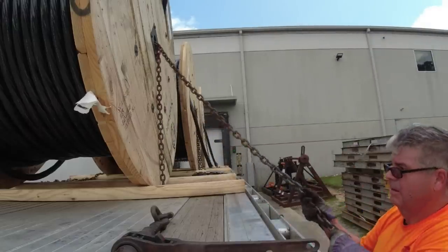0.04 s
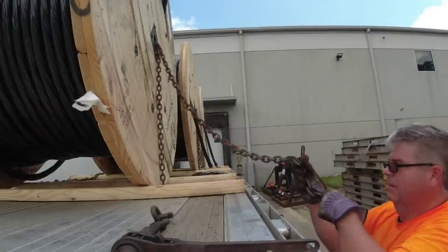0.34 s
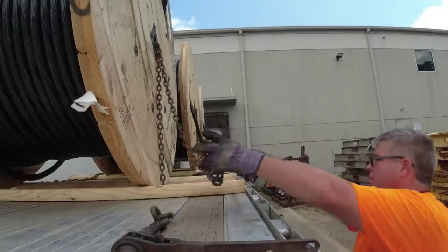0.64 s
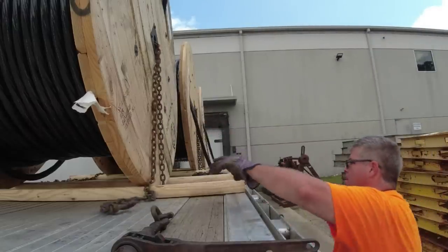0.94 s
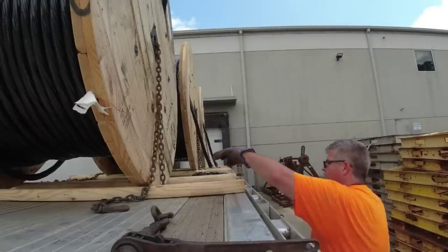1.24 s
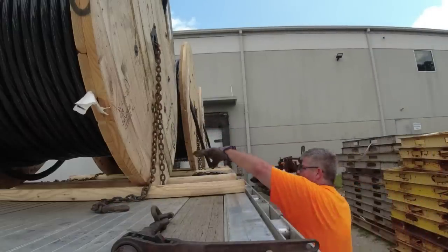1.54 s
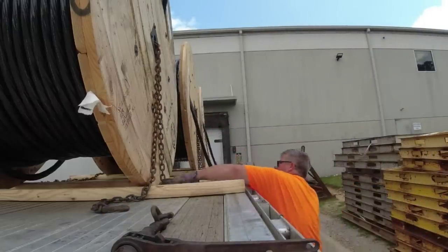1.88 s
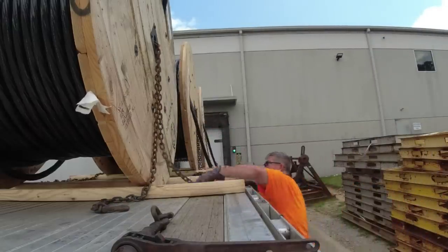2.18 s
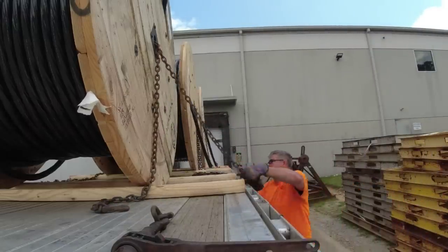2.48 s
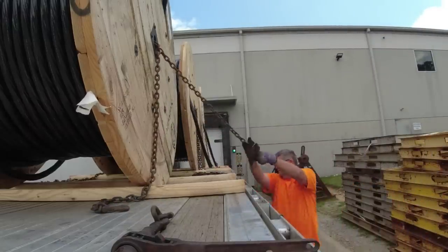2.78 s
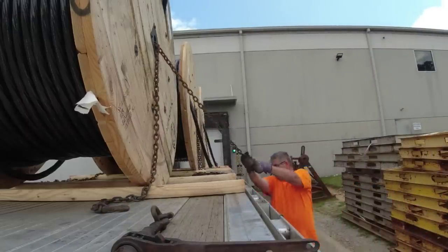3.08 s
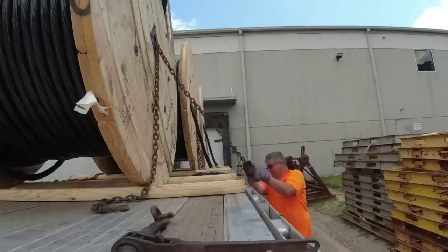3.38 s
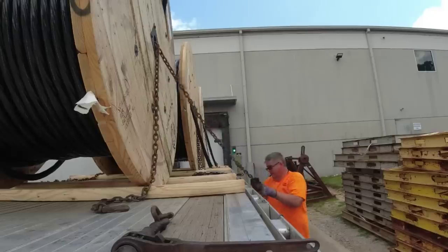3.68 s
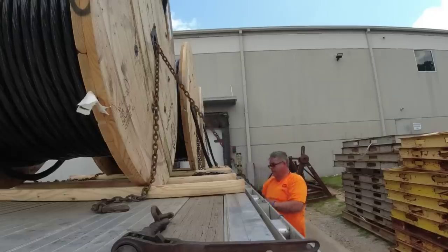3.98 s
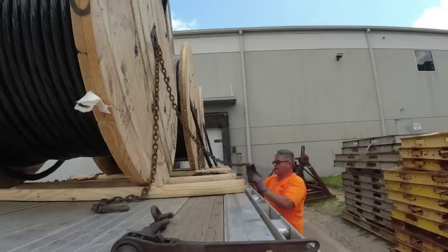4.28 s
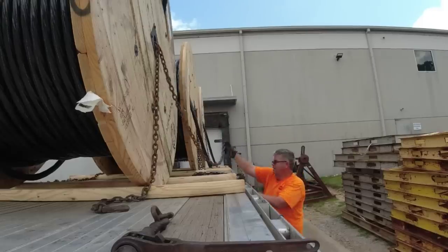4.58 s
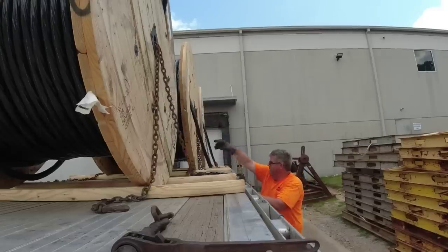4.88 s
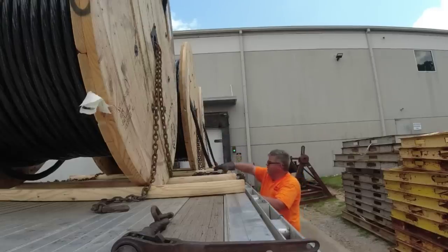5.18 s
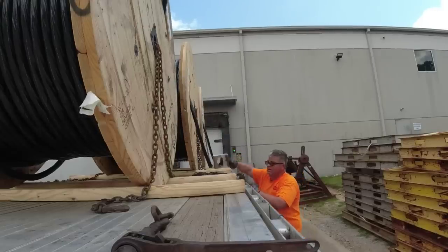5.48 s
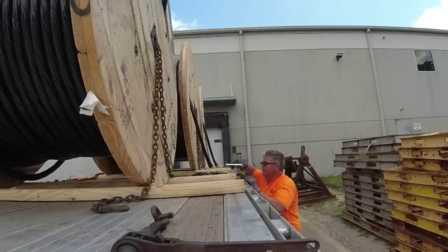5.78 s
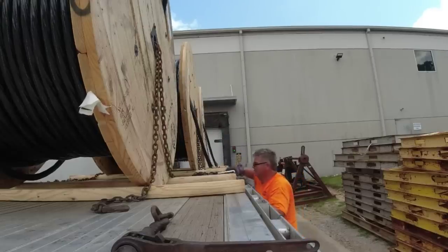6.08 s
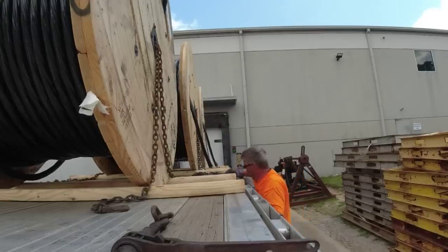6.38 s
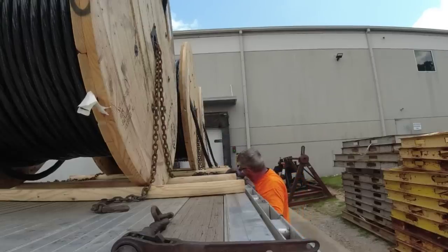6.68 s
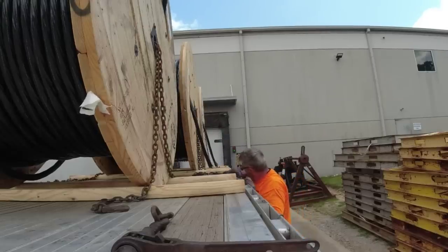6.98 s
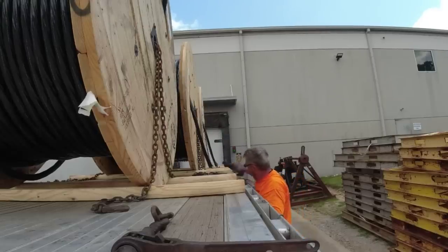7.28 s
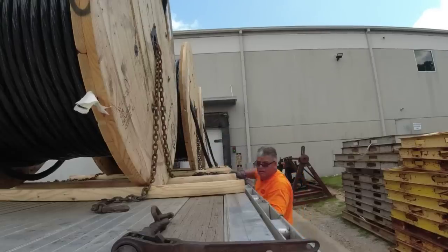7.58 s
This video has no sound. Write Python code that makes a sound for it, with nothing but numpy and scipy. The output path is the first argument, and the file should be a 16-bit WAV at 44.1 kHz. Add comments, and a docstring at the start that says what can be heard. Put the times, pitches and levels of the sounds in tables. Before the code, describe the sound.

A diesel engine idles with a low, steady hum throughout, over faint distant machinery in an open yard. After a few tiny clinks, a steel chain crashes onto a trailer deck close by at about 0.9 seconds, thumping the boards and jingling, slightly overloading the microphone. A soft clink comes just after 2 seconds. From 3 seconds the chain scrapes over a wooden cable reel, links ticking louder and the wood knocking dully, until it comes free with a clank at about 4.1. A light ping follows at 4.5. At 5 seconds comes a second loud crash, with a sharp ping of the hook and rattling that settles by 5.8. Smaller clanks land around 6.3 and 7.2 seconds. From 7 seconds to the end, the trailer bed gives a deep boom. A warehouse wall adds a faint, dull echo to the impacts.

```python
"""A yard beside a warehouse, the microphone close to a flatbed trailer, a diesel idling nearby.
A steel tie-down chain is tossed onto the deck, hauled over a wooden cable reel and dropped again.
Heaps of links clatter and thump the boards, single links tick and ring, the hook pings, the reel knocks.
The heaviest falls overload the microphone, and near the end the trailer bed booms as it is leant on.
The warehouse wall returns a faint tail; far machinery and air lie underneath."""
import sys
import numpy as np
from scipy import signal
from scipy.fft import rfft, irfft
from scipy.io import wavfile

SR = 44100
rng = np.random.default_rng(int(sys.argv[2]) if len(sys.argv) > 2 else 0)


def write(x):
    x = np.atleast_2d(x).T
    wavfile.write(sys.argv[1], SR, np.round(np.clip(x, -1, 1) * 32767).astype(np.int16))


N = 341334
T = np.arange(N) / SR
HIT = T[:SR // 2]  # time axis of one impact
HOLD_S = 0.0081  # links keep arriving at full strength this long

# Modes of the deck boards and steel frame. Each row: frequency in Hz, relative level in dB, t60 in seconds.
DECK_MODES = [(252, -14.5, 0.051), (378, -4.5, 0.13), (434.4, -4.5, 0.13), (500.6, -2, .18),
              (572.4, -5, .18), (627.5, -5.5, 0.16), (752.2, 0, 0.12), (867, -5, 0.12), (1100, 0.5, 0.12),
              (1348, -10, 0.22), (1535, -8, 0.18), (1623, -9.5, 0.29), (1950, -8.5, 0.24),
              (2230, -1, 0.076), (2471, -5.5, 0.35), (2768, -0.5, 0.19), (3526, -7.5, 0.15),
              (4130, -1, 0.14)]
# The chain sliding over the reel's rim. Each row: time in seconds, level in dB.
DRAG_LEVELS = [(2.981, -62), (3.032, -36.5), (3.156, -32.5), (3.28, -41), (3.36, -27.5), (3.54, -23.5),
               (3.62, -26), (3.83, -28.5), (4.1, -25)]


def amp(db):
    """Decibels to gain."""
    return 10 ** (np.asarray(db) / 20)


def unit(x, size=None):
    """Scale to rms 1, judged over the first `size` samples or over all."""
    return x / np.sqrt(np.mean(x[:size] ** 2) + 1e-18)


def add(track, s, sound):
    """Mix a sound in at s seconds."""
    start = max(int(s * SR), 0)
    track[start:start + len(sound)] += sound[:N - start]


def fade(t, t60):
    """Exponential decay, 60 dB down after t60 seconds."""
    return np.exp(-np.log(1000) * t / np.maximum(t60, 1e-3))


def band(x, lo_hz, hi_hz, order=3):
    """Causal band-pass."""
    sos = signal.butter(order, [lo_hz, min(hi_hz, SR / 2 - 1)], "band", fs=SR, output="sos")
    return signal.sosfilt(sos, x)


def colour(x, points, size=2048):
    """Causal filter through (Hz, dB) points, by way of the cepstrum."""
    hz, db = np.transpose(points)
    bin_hz = np.arange(size // 2 + 1) * SR / size
    gain = amp(np.interp(np.log(bin_hz + 1), np.log(hz), db))
    cepstrum = irfft(np.log(gain))
    cepstrum[1:size // 2] *= 2  # fold to minimum phase
    cepstrum[size // 2 + 1:] = 0
    return signal.fftconvolve(x, irfft(np.exp(rfft(cepstrum))))[:len(x)]


def walk(rate):
    """Slow random wander with a spread near 1, turning `rate` times a second."""
    return np.interp(T * rate, np.arange(512), rng.standard_normal(512))


def ring(hz, gain, t60):
    """Struck modes: a sum of decaying sines."""
    t = HIT.astype(np.float32)
    turn = np.float32(2 * np.pi * hz)
    loss = np.float32(np.log(1000) / np.maximum(t60, 1e-3))
    modes = np.sin(np.outer(turn, t)) * np.exp(-np.outer(loss, t))
    return (np.float32(gain) @ modes).astype(float)


def contacts(n, rate, spread_db):
    """Random clicks of uneven strength, about `rate` a second."""
    clicks = (rng.random(n) < rate / SR) * rng.choice([-1, 1], n)
    return clicks * amp(spread_db * np.clip(rng.standard_normal(n), -2, 2))


def pour(t, settle_s, rest_s=.34):
    """Strength of the contacts: steady while links arrive, then dying as the heap settles and rests."""
    settling = np.maximum(t - HOLD_S, 0) / max(settle_s, .004)
    return (t >= 0) * np.exp(-settling - (t / rest_s) ** 4)


def crunch(hits, t60):
    """Every contact sets off its own short, pitchless crack."""
    power = signal.fftconvolve(hits ** 2, unit(fade(HIT, t60)) ** 2)[:len(hits)]
    return np.sqrt(np.abs(power)) * rng.standard_normal(len(hits))


def diesel(cycle_hz=14.9, waver_db=0.84, smear=0.037, rumble_db=-45):
    """A diesel idles nearby: steady exhaust lines, each wavering a little, over a soft rumble."""
    # The exhaust note at the microphone. Each row: time in seconds, level in dB.
    idle_levels = [(0, -31.5), (2.802, -33.5), (3.7, -31), (7.699, -30.5)]
    # Exhaust lines; six cylinders stress every third.
    # Each row: multiple of the cycle rate, relative level in dB.
    orders = [(3, 0.5), (4, -3), (5, -11.5), (6, -5.5), (7, -7), (8, -6), (9, 0), (11, -4), (12, 0.5),
              (13, -24.5), (14, -17), (16, -11.5), (17, -16.5), (19, -23), (20, -17), (22, -20),
              (23, -18.5), (28, -18.5)]
    lines = 0
    for order, line_db in orders:
        # the silencer delays higher lines more, which smears the firings into a smooth drone
        cycles = cycle_hz * T - smear * order
        lines += amp(line_db + waver_db * walk(4.8)) * np.sin(2 * np.pi * order * cycles)
    rumble_colour = [(15, -5.5), (35, 4.5), (130, -12.5), (300, -7.5),
                     (450, -14.5), (900, -35), (3000, -75.5)]
    rumble = colour(rng.standard_normal(N), rumble_colour)
    s, db = np.transpose(idle_levels)
    return unit(lines) * amp(np.interp(T, s, db)) + amp(rumble_db) * unit(rumble)


def yard(level_db=-44.5):
    """Far machinery and air, smooth and steady."""
    # Spectrum of the open yard. Each row: frequency in Hz, relative level in dB.
    yard_colour = [(150, -8), (300, 1.5), (400, -6), (600, -7.5), (930, -11), (2100, -18.5), (3500, -27),
                   (5500, -33.5), (8000, -47), (15000, -75)]
    return unit(colour(rng.standard_normal(N), yard_colour)) * amp(level_db)


def tick(snap_t60=0.007, rustle_t60=0.3, rustle_db=-22, ring_t60=0.059, ring_db=-4, count=12):
    """A hard snap, a damped ring of the taut link and a short rustle of its neighbours."""
    # Tone of a snapping link. Each row: frequency in Hz, relative gain in dB.
    tick_colour = [(200, 5), (1300, 12.5), (2500, -3), (4800, 5), (6000, -1), (7200, -8), (11000, -15.5),
                   (15500, -30)]
    envelope = fade(HIT, snap_t60) + amp(rustle_db) * fade(HIT, rustle_t60)
    snap = rng.standard_normal(len(HIT)) * envelope
    chink = ring(rng.uniform(2500, 6500, count), rng.standard_normal(count), np.full(count, ring_t60))
    return unit(colour(unit(snap) + amp(ring_db) * unit(chink), tick_colour), size=1323)


def ticks(tick_db=-3, pull_s=3.48, links_per_s=25, train_db=-7.5, jitter=0.29, scatter_db=3):
    """Lone snaps, then from pull_s a loose train of links crossing the rim that grows with the pull."""
    # Single links snapping over an edge. Each row: start in seconds, relative level in dB.
    snaps = [(0.131, -50), (0.15, -47.5), (0.199, -58), (0.23, -56), (3.036, -43), (3.079, -35.5),
             (3.158, -36), (3.336, -33.5), (3.352, -31), (3.458, -30), (3.523, -29), (3.568, -27.5),
             (3.745, -27), (3.777, -28), (4.039, -30), (5.446, -24.5)]
    out = np.zeros(N)
    for s, db in snaps:
        add(out, s, amp(db + tick_db) * tick())
    drag_s, drag_db = np.transpose(DRAG_LEVELS)
    full_db, growth = -24, 2  # around the full pull, ticks change 2 dB for each dB of sliding
    for s in np.arange(pull_s, drag_s[-1], 1 / links_per_s):
        late, strength = rng.standard_normal(2)
        pull_db = full_db + growth * (np.interp(s, drag_s, drag_db) - full_db)
        db = pull_db + train_db + scatter_db * strength
        add(out, s + jitter * late / links_per_s, amp(db + tick_db) * tick())
    return out


def free_links(top_db, shake_s, detune, scatter_db=2, count=5, top_above_hz=13000):
    """A few free links of slightly unlike pitch jostle each other and ring on."""
    # Modes of a free link. Each row: frequency in Hz, relative level in dB, t60 in seconds.
    link_modes = [(3790, -7, 0.24), (4944, -7, .17), (5260, 0.5, 0.27), (6860, -5, .35), (10000, -13, 0.34),
                  (12150, -19, 0.27), (13600, -1, .2), (14300, -2, .2), (14650, -1, .2), (15020, -3.5, .15)]
    hz, db, t60 = np.transpose(link_modes)
    db = db + top_db * (hz > top_above_hz)
    out = 0
    for _ in range(count):
        offset, strength = rng.standard_normal((2, len(hz)))
        tone = ring(hz * (1 + detune * offset), amp(db + scatter_db * strength), t60)
        shake = contacts(len(HIT), rate=610, spread_db=2) * pour(HIT + HOLD_S, shake_s)
        out = out + signal.fftconvolve(shake / np.linalg.norm(shake), tone)
    return out / np.sqrt(count)


def jingles(detune=0.0053, detune_per_s=.12):
    """Loose links ring when nudged or dropped; a longer shake stirs links of more varied size."""
    # Links left free to ring. Each row: start in seconds, level in dB, extra gain of the top
    # partials in dB, shaking time in seconds.
    nudges = [(0.145, -69, 13, 0.079), (0.279, -61, 24, 0.014), (0.665, -69.5, 18, 0.0082),
              (0.755, -39, 3, 0.028), (0.9, -20.5, 9.5, 0.07), (1.115, -23, 0.5, 0.02),
              (2.126, -59, -8, .012), (4.129, -35, -25, .02), (4.781, -52.5, -27.5, 0.0063),
              (4.873, -41, -13, 0.011), (5.0, -27.5, 9, .08), (5.255, -27.5, -3.5, .04),
              (5.44, -40, -2, .02), (5.715, -50, -14.5, .012)]
    out = np.zeros(N)
    for s, db, top_db, shake_s in nudges:
        add(out, s, amp(db) * free_links(top_db, shake_s, detune + detune_per_s * shake_s))
    return out


def clank(settle_s, deck_db=-7, heap_db=-1, heap_t60=0.071, lead_db=9, rise_s=0.0017, count=56):
    """A run of link contacts, then the slack end; each cracks and rings the deck and the heap of links."""
    # Tone of a landing, heard close. Each row: frequency in Hz, gain in dB.
    clank_colour = [(100, -17.5), (250, -2), (500, -6.5), (1000, -2), (1600, 3), (2500, -1.5), (3200, -2),
                    (4500, -0.5), (6000, -11), (7200, -21), (12500, -28.5), (15500, -40)]
    hits = contacts(len(HIT), rate=750, spread_db=5.5)
    hits[0] = amp(lead_db)
    slack_end = amp(-13.5) * pour(HIT - 1.5 * settle_s, 0.88 * settle_s)
    hits *= np.hypot(pour(HIT, settle_s), slack_end)
    hz, db, t60 = np.transpose(DECK_MODES)
    # the chain's own weight shifts the deck modes a little
    loaded_hz = hz * (1 + .015 * rng.standard_normal(len(hz)))
    deck = ring(loaded_hz, amp(db) * rng.choice([-1, 1], len(hz)), t60)
    # links wedged against each other ring at new pitches with every landing; high modes die first
    heap_hz = 700 * 20 ** ((np.arange(count) + rng.random(count)) / count)
    heap_gain = rng.choice([-1, 1], count) * np.sqrt(heap_hz)
    heap = ring(heap_hz, heap_gain, heap_t60 * np.sqrt(3000 / heap_hz))
    rings = signal.fftconvolve(hits, amp(deck_db) * unit(deck) + amp(heap_db) * unit(heap))[:len(HIT)]
    cracks = crunch(hits, t60=.055)
    return colour((rings + cracks) * (1 - np.exp(-HIT / rise_s)), clank_colour)


def clanks(clang_db=-2.5, sizzle_trim_db=-3):
    """Landings on wood thud; landings have a hard edge, and their sizzle depends on whether the reel shadows
    them from the microphone."""
    # Lengths of chain landing. Each row: start in seconds, base level in dB, offsets in dB for thud,
    # edge and sizzle (before its trim), settling time in seconds.
    landings = [(0.275, -37, -3.5, -22, -19, 0.0076), (0.356, -40, -8, -12.5, -25, 0.019),
                (0.859, -8.5, -8, -18.5, -23.5, 0.038), (0.879, -2, -10.5, -1.5, -17, 0.083),
                (0.958, -2.5, -12.5, -6.5, -16.5, 0.049), (1.109, -10.5, -10, -6, -13, 0.036),
                (1.138, -13, -10, -7.5, -24, 0.038), (1.504, -42, -24, -8.5, -45, 0.0096),
                (2.121, -35, 2, -6.5, -10, 0.022), (2.149, -28.5, -2, -24, -38, 0.043),
                (2.204, -35, 2, -4.5, -24, 0.019), (3.18, -47, 11.5, -29, -45, 0.044),
                (3.441, -32.5, 7, -6, -16, .04), (3.549, -27.5, -8, -8, -24, 0.035),
                (3.624, -20, -10, -4.5, -24, 0.044), (3.871, -37, 13.5, -5, -35, 0.022),
                (4.129, -14, -11, -7, -24, 0.053), (4.364, -39.5, -19, -8.5, -27, 0.018),
                (4.549, -23.5, -18, -15, -29.5, 0.039), (4.992, -2, -6, -7, -14.5, 0.058),
                (5.173, -17, -5, -7.5, -11.5, 0.046), (5.235, -4.5, -14.5, -10, -28.5, 0.042),
                (5.336, -20, -10, -5, -16, 0.061), (5.461, -25, -17.5, -4, -13, 0.044),
                (5.53, -33.5, -27, -12, -30, 0.037), (5.698, -33.5, -30, -16, -31, .065),
                (5.891, -50, 7.5, -30, -40, 0.0098), (6.239, -23, -2, -18, -43.5, 0.033),
                (6.279, -25.5, -2, -8, -32, 0.033), (6.356, -16.5, -4, -3, -11.5, 0.035),
                (6.802, -42.5, 2.5, -19, -50, .03), (7.052, -23, -0.5, -11, -34, 0.055),
                (7.166, -16, -4, -9.5, -43, .037), (7.237, -22.5, 3.5, -14, -32, 0.027)]
    out = np.zeros(N)
    for s, db, thud_db, edge_db, sizzle_db, settle_s in landings:
        sound = clank(settle_s)
        bands = [(150, 667, thud_db), (780, 2660, clang_db),
                 (3050, 7300, edge_db), (6760, 17000, sizzle_db + sizzle_trim_db)]
        for lo_hz, hi_hz, band_db in bands:
            part = unit(band(sound, lo_hz, hi_hz, order=4), size=1764)  # level set on the first 40 ms
            add(out, s, amp(db + band_db) * part)
    return out


def slams(thump_t60=0.08, db_per_octave=-14):
    """The chain's weight drives the boards, most strongly near a pitch that depends on where it lands."""
    # The heaviest falls. Each row: start in seconds, level in dB, centre frequency in Hz.
    falls = [(0.859, -0.5, 477), (0.965, -1.5, 760), (1.01, -10, 750), (4.993, -2, 440),
             (6.242, -18.5, 393), (7.168, -20.5, 560)]
    out = np.zeros(N)
    hz, db, _ = np.transpose(DECK_MODES)
    for s, slam_db, centre_hz in falls:
        octaves_off = np.abs(np.log2(hz / centre_hz))
        gain = amp(db + db_per_octave * octaves_off) * rng.choice([-1, 1], len(hz))
        thump = ring(hz, gain, np.full(len(hz), thump_t60))
        add(out, s, amp(slam_db) * unit(thump, size=882))
    return out


def pings_and_knocks(rise_s=0.0014):
    """The hook pings and the boards and reel knock, each strike on a single mode."""
    # Lone notes. Each row: start in seconds, frequency in Hz, level in dB, t60 in seconds.
    strikes = [(0.965, 731.6, -6.5, 0.41), (3.445, 94, -12.5, .28), (3.556, 119, -13.5, .21),
               (3.872, 142, -13.5, 0.085), (4.55, 2060, -29.5, .36), (4.553, 2790, -27.5, 0.35),
               (4.995, 251, -13.5, 0.55), (4.996, 517, -5.5, .17), (5.237, 2392, -3, 0.11),
               (5.511, 5880, -29.5, 0.45), (5.53, 3100, -26.5, .19), (5.53, 1042, -36, 0.88),
               (6.28, 3175, -16, 0.1), (6.361, 192, -14.5, 0.16), (7.169, 552, -15.5, 0.39)]
    out = np.zeros(N)
    attack = 1 - np.exp(-HIT / rise_s)
    for s, hz, db, t60 in strikes:
        add(out, s, amp(db) * np.sin(2 * np.pi * hz * HIT) * fade(HIT, t60) * attack)
    return out


def drag(stop_t60=0.89):
    """Links bump and scrape along the reel's wooden rim until the chain comes free."""
    # Tone of steel sliding on the reel. Each row: frequency in Hz, relative gain in dB.
    drag_colour = [(100, 4), (220, 3), (350, 2.5), (400, -8), (480, 6.5), (600, -9.5), (850, -12),
                   (1220, 3), (1770, -13.5), (2800, -10), (3300, -21), (4500, -19), (5800, -23),
                   (9000, -46), (15000, -51.5)]
    s, db = np.transpose(DRAG_LEVELS)
    scrape = crunch(contacts(N, rate=350, spread_db=3), t60=.03)
    level = amp(np.interp(T, s, db, left=-120)) * fade(np.maximum(T - s[-1], 0), stop_t60)
    return unit(colour(scrape, drag_colour)) * level


def sway(mode_hz=51.5, wander_hz=.8):
    """The long trailer bed booms at its lowest mode."""
    # The bed swaying as it is leant on. Each row: time in seconds, level in dB.
    sway_levels = [(7.04, -46), (7.09, -20), (7.2, -27), (7.3, -25.5), (7.45, -24), (7.53, -42),
                   (7.73, -34)]
    s, db = np.transpose(sway_levels)
    phase = 2 * np.pi * np.cumsum(mode_hz + wander_hz * walk(26)) / SR
    return np.sqrt(2) * np.sin(phase) * amp(np.interp(T, s, db, left=-120))


def wall(x, wet_db=-29, low_t60=0.53, high_t60=0.31, build_s=0.046):
    """The warehouse front and stacked pallets scatter a faint, dull tail back to the microphone."""
    t = T[:SR]
    noise = rng.standard_normal(SR)
    tail = band(noise, 180, 2500) * fade(t, low_t60) + .7 * band(noise, 3040, 6500) * fade(t, high_t60)
    tail *= 1 - np.exp(-t / build_s)
    return amp(wet_db) * signal.fftconvolve(x, tail / np.linalg.norm(tail))[:N]


def scene():
    """Chain and trailer up close, engine and yard behind, heard alike on both sides."""
    chain = clanks() + slams() + ticks() + jingles() + pings_and_knocks() + drag()
    return np.tile(chain + wall(chain) + sway() + diesel() + yard(), (2, 1))


def record(dry, ceiling=0.67, top_hz=15700):
    """The close microphone saturates on the heaviest falls; the top is cut steeply."""
    clipped = dry / (1 + (dry / ceiling) ** 10) ** (1 / 10)
    return signal.sosfilt(signal.ellip(10, .2, 70, top_hz, fs=SR, output="sos"), clipped)


dry = scene()
out = record(dry)
write(out)
```